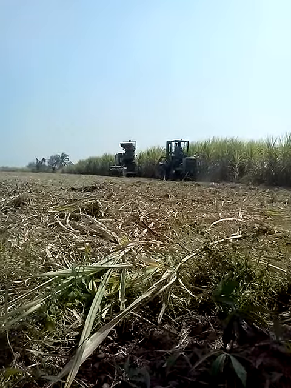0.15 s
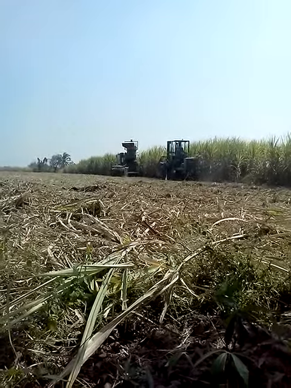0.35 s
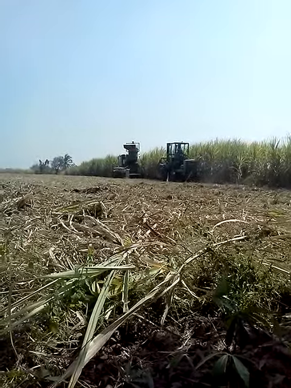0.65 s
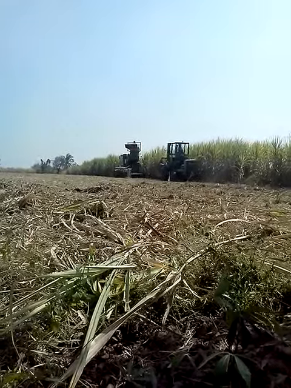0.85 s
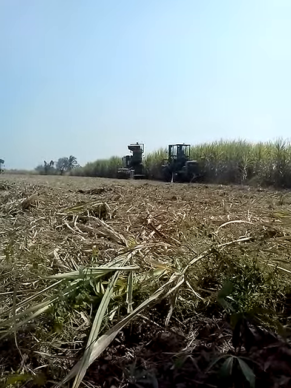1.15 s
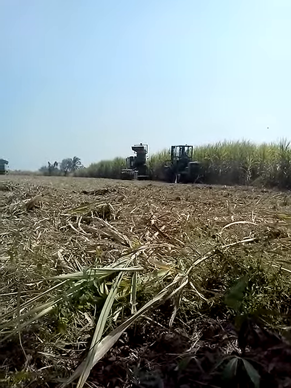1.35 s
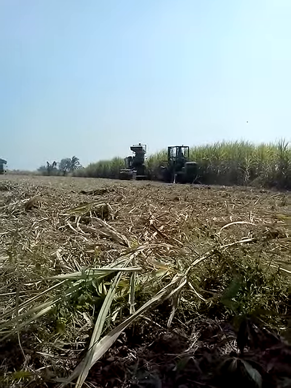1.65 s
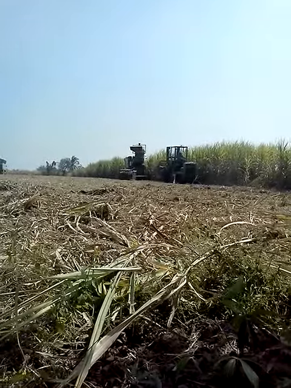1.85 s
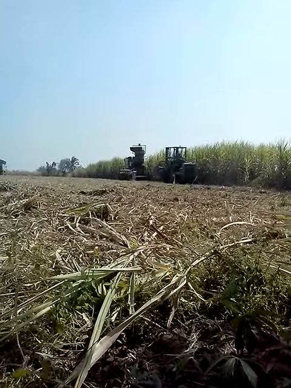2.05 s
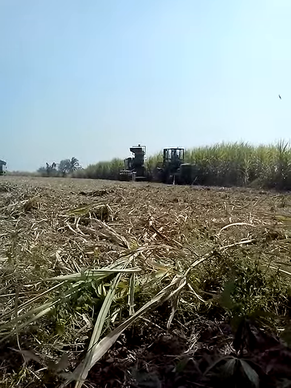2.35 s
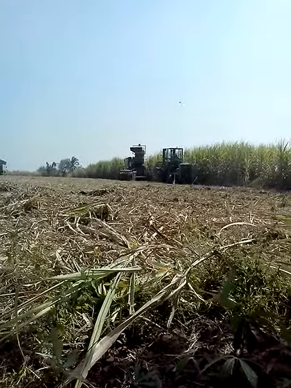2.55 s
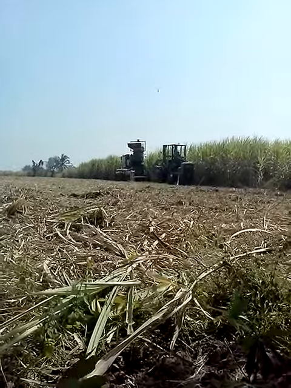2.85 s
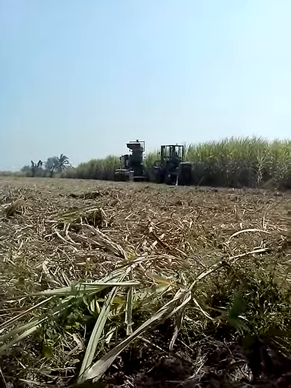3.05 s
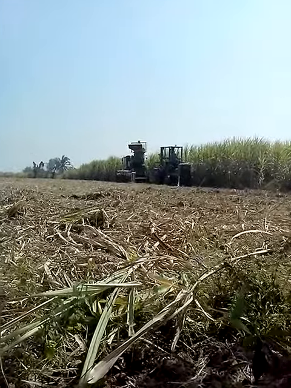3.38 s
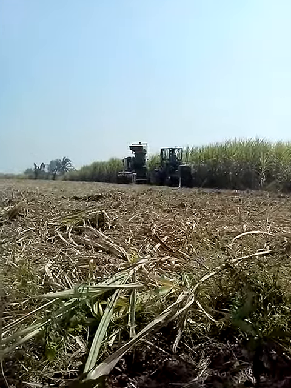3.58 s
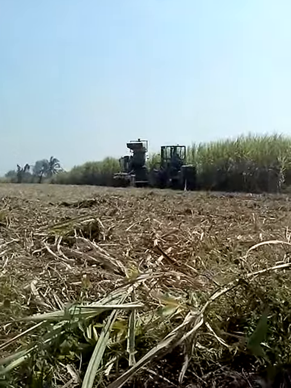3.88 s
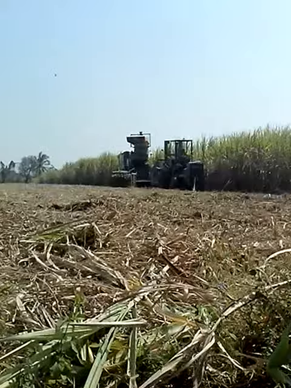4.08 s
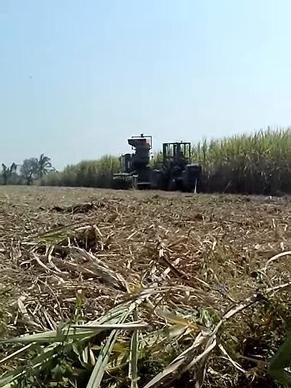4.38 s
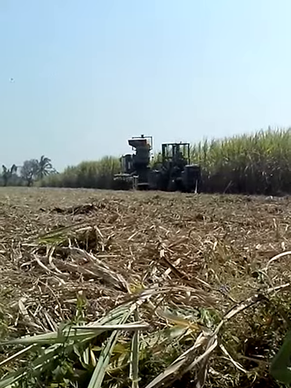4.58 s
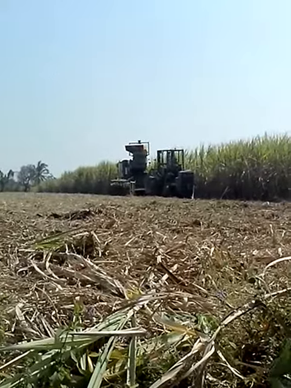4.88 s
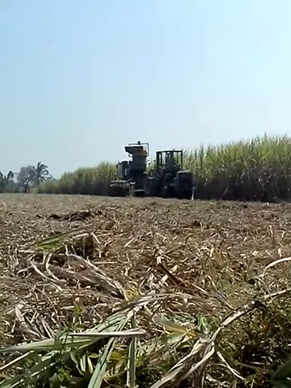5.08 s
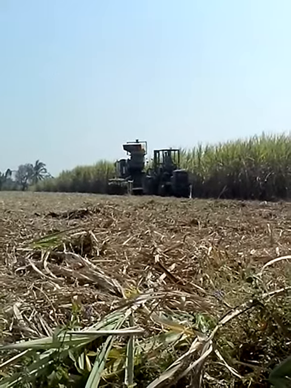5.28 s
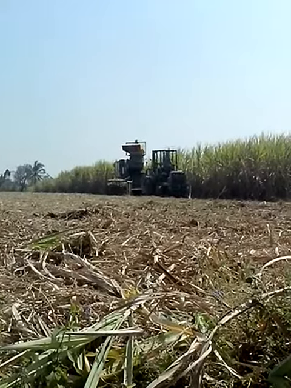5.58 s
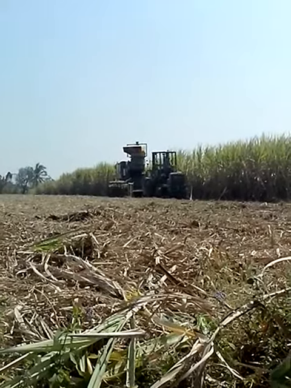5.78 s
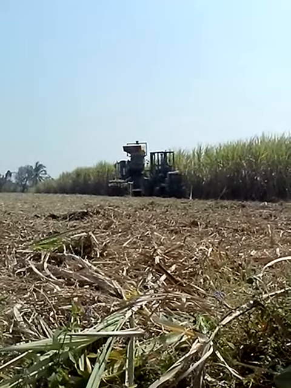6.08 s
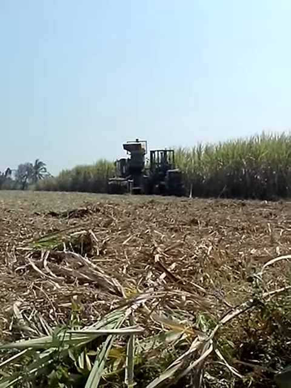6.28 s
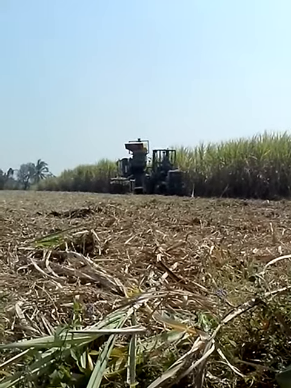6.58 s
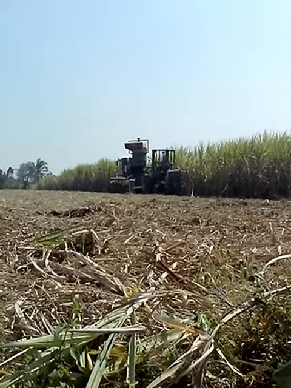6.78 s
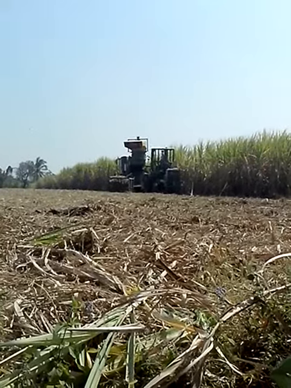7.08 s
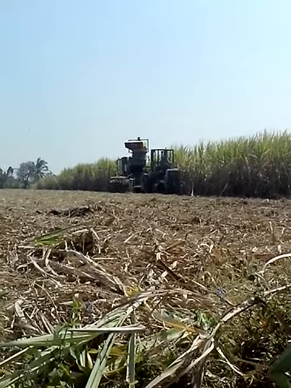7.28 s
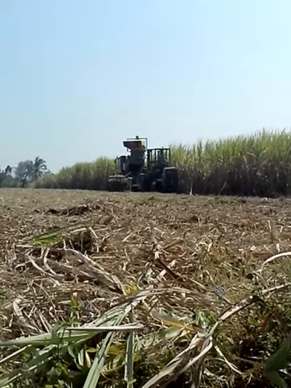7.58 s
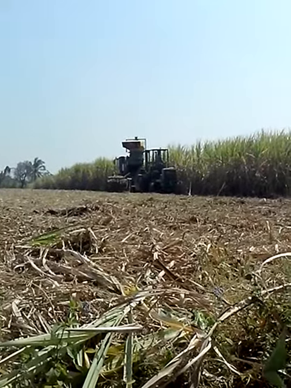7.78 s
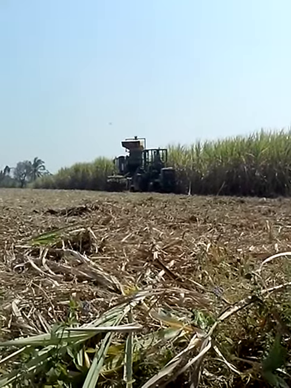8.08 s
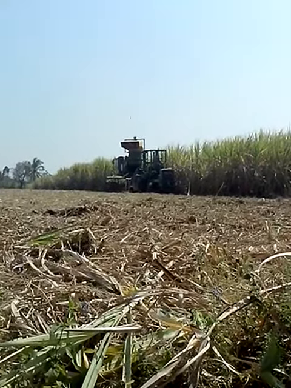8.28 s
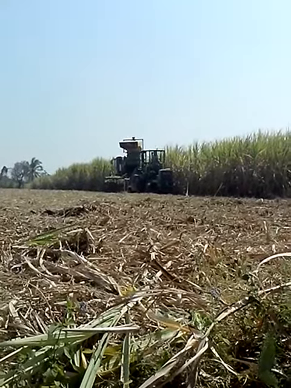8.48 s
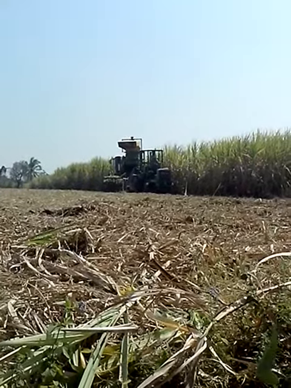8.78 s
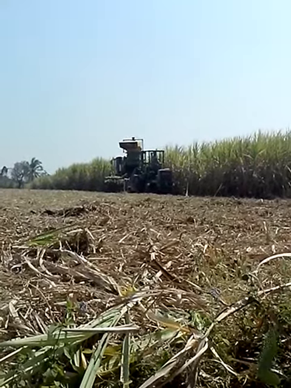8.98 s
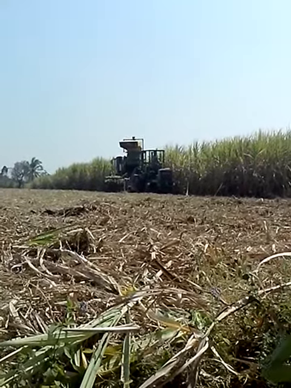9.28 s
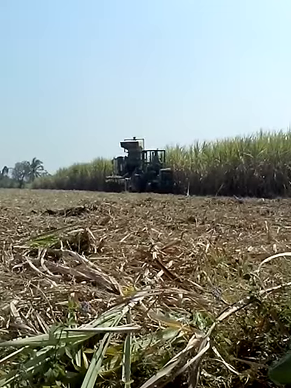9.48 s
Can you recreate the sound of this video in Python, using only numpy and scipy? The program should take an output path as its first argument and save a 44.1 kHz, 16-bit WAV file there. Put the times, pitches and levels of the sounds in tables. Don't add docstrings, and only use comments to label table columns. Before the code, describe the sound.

Distant farm engines: rough metallic diesel clatter above a broad chopping-machine roar, easing to a lower, slower idle, with low wind thumps and one dry leaf tick.

```python
import sys
import numpy as np
from scipy import signal
from scipy.fft import rfft, irfft, next_fast_len
from scipy.io import wavfile
from scipy.ndimage import uniform_filter1d, map_coordinates

SR = 44100
rng = np.random.default_rng(int(sys.argv[2]) if len(sys.argv) > 2 else 0)


def gain_from_db(level_db):
    decades = np.asarray(level_db, float) / 20
    return 10 ** decades


def wav_record(signal):
    frames = np.transpose(np.atleast_2d(signal))
    bounded = np.clip(frames, -1, 1)
    quanta = np.round(bounded * 32767).astype(np.int16)
    wavfile.write(sys.argv[1], SR, quanta)


N = 425565


def unit(x):
    return x / np.sqrt(np.mean(x ** 2) + 1e-20)


def along(points, hz):
    f, v = np.transpose(points)
    return np.interp(np.log(hz + 1), np.log(f + 1), v)


def curves(rows):
    s, *cols = np.transpose(rows)
    return [np.interp(np.arange(N) / SR, s, c) for c in cols]


def spells(rows):
    t = np.arange(N) / SR
    return sum(db * np.exp(-((t - s) / half) ** 2) for s, half, db in rows)


def wobble(rate):
    return map_coordinates(rng.standard_normal(int(N * rate / SR) + 4), [np.arange(N) * rate / SR])


def filtered(x, response):
    m = next_fast_len(N + SR // 2)
    return irfft(rfft(x, m) * response(np.fft.rfftfreq(m, 1 / SR)), m)[..., :N]


def resonances(modes):
    def response(f):
        return sum(gain_from_db(db) * (1j * f * w / (c * c - f * f + 1j * f * w)) ** 2 for c, w, db in modes)
    return response


def rush(spectrum, patchy_db):
    z = signal.stft(rng.standard_normal(N), nperseg=512)[2]
    field = uniform_filter1d(rng.standard_normal(z.shape), size=6, axis=0)
    field = uniform_filter1d(field, size=14, axis=1)
    noise = signal.istft(z * gain_from_db(patchy_db * unit(field)), nperseg=512)[1][:N]
    return unit(filtered(noise, lambda hz: gain_from_db(along(spectrum, hz))))


# [t/s, level/dB]
BREEZE = [(0, -32), (.4, -35.5), (.73, -35.5), (2.04, -34), (3.5, -38), (4.84, -36.5), (5.59, -40),
          (6.3, -35.5), (6.8, -36), (7.3, -34.5), (7.9, -33), (8.4, -36), (9.65, -34)]
# [f/Hz, level/dB]
RUMBLE = [(18, -81.5), (30, -49.5), (69, -10), (78, -12), (92, -10), (138, -0.5), (155, -1.5), (182, -5.5),
          (220, -9.5), (253, -12.5), (346, -18), (387, -23.5), (473, -27), (600, -27.5), (780, -58),
          (1320, -120)]
# [centre t/s, half length/s, level/dB]
GUSTS = [(1.35, 0.043, 5.5), (1.51, 0.077, 8.5), (1.89, 0.071, 10.5), (3.03, 0.044, 9), (5.9, 0.02, 5.5),
         (6.62, .04, 4.5), (8.17, .05, 5), (8.6, 0.018, 6.5)]
# [centre t/s, peak level/dB, f/Hz]
EDDIES = [(0.18, -24, 159), (0.2244, -18.5, 163), (0.3509, -24.5, 168), (1.3548, -19, 163),
          (1.464, -26, 390), (1.478, -14, 282), (1.4841, -13, 152.5), (1.5144, -14.5, 159),
          (1.5506, -15.5, 178), (1.5598, -15, 153), (1.6632, -23, 533), (1.666, -28, 330),
          (1.4939, -17.5, 110), (1.908, -16, 113), (1.7272, -16.5, 171), (1.8338, -14, 189),
          (1.836, -19, 264), (1.8613, -14.5, 149), (1.9003, -17, 218), (1.9117, -22, 141),
          (1.9544, -12.5, 136), (2.3217, -21, 169), (2.3459, -23, 159), (2.4643, -20.5, 181),
          (3.015, -15.5, 132.6), (3.0536, -16.5, 158), (3.079, -19.5, 143), (7.423, -22.5, 140),
          (7.6566, -22.5, 180), (8.141, -16.5, 140)]
EDDY_CYCLES = 0.91


def wind():
    lumpy = gain_from_db(1.2 * wobble(25)) * rush(RUMBLE, patchy_db=0)
    rumble = gain_from_db(curves(BREEZE)[0] + spells(GUSTS)) * unit(lumpy)
    eddies, t = np.zeros(N + SR), np.arange(-SR // 25, SR // 25) / SR
    for s, db, hz in EDDIES:
        phase = rng.uniform(0, 2 * np.pi)
        swing = np.cos(2 * np.pi * hz * t * (1 - 12 * t) + phase)
        eddies[round(s * SR):][:len(t)] += gain_from_db(db) * np.exp(-(t * hz / EDDY_CYCLES) ** 2) * swing
    return rumble + eddies[SR // 25:][:N]


# [t/s, peak level/dB, f/Hz, length/s]
LEAF = [
    (9.418, -42, 6880, .008),
    (9.431, -41, 7160, 0.0071),
    (9.432, -34, 5000, 0.0088),
    (9.433, -26.5, 6140, 0.0082),
    (9.444, -25, 7040, 0.0034),
    (9.4435, -38, 590, 0.0045),
]


def leaf():
    ticks = np.zeros(N + SR)
    for s, db, hz, length in LEAF:
        t = np.arange(round(length * SR)) / SR
        ring = np.sin(2 * np.pi * hz * t) + 0.55 * rng.standard_normal(SR // 30)[:len(t)]
        ticks[round(s * SR):][:len(t)] += gain_from_db(db) * np.sin(np.pi * (t / length) ** 1.3) * ring
    return ticks[:N]


# [f/Hz, level/dB]
DRONE = [(51.5, -58), (103, -43), (154, -46)]
DRONE_FROM_S = 6.85


def drone():
    t = np.arange(N) / SR
    lines = 0
    for hz, db in DRONE:
        lines = lines + gain_from_db(db + 1.6 * wobble(3.9)) * np.sin(2 * np.pi * hz * t + .5 * wobble(2.4))
    return np.clip((t - DRONE_FROM_S) / 0.1, 0, 1) * lines


# [t/s, level/dB]
LOAD = [(0, -33), (.6, -36), (.76, -34.5), (1.02, -35), (1.84, -34.5), (2.76, -37), (3.04, -36.5),
        (3.63, -37), (4.15, -36.5), (5, -39), (6.39, -41.5), (7.25, -39), (8.05, -41), (9.05, -43.5),
        (9.65, -41)]
# [f/Hz, level/dB per Hz]
ROAR = [(180, -37), (300, -5), (389, -11), (463, -6), (525, -13.5), (809, -2.5), (953, -10), (1220, 2),
        (1350, -1), (1560, -9.5), (1980, 0), (2160, -5.5), (2340, -5), (2520, -11.5), (3000, -13),
        (3900, -34), (6600, -120)]
# [f/Hz, level/dB per Hz]
HISS = [(1530, -42), (2600, -20.5), (3160, -8), (3960, -1), (4640, -5), (5060, -2.5), (5760, -13),
        (6270, -9.5), (6930, -15.5), (7540, -22.5), (8050, -19), (8590, -40), (11200, -69.5), (18900, -120)]
# [f/Hz, level/dB]
GEARS = [(825, -64), (1199, -59)]
HISS_DB, HISS_FOLLOWS = -44, 0.24


def harvester(count, effort_db):
    pulse = 1 + 0.071 * np.cos(2 * np.pi * count)
    roar = pulse * gain_from_db(0.31 * wobble(12)) * rush(ROAR, patchy_db=0.5)
    t = np.arange(N) / SR
    gears = 0
    for hz, db in GEARS:
        level = gain_from_db(db + 42.5 + 2.2 * wobble(2.2))
        gears = gears + level * np.sin(2 * np.pi * hz * t + 1.57 * wobble(4))
    hiss_db = HISS_DB + HISS_FOLLOWS * (effort_db - effort_db.mean())
    hiss = gain_from_db(hiss_db + 1.0 * wobble(20)) * rush(HISS, patchy_db=1.5)
    return gain_from_db(curves(LOAD)[0]) * (roar + gears) + hiss


# [t/s, firing rate f/Hz]
SPEED = [(0.0, 44.74), (0.598, 49.14), (0.727, 46.43), (2.471, 45.42), (2.63, 43.11), (2.808, 46.33),
         (4.225, 44.01), (4.375, 41.31), (4.542, 44.5), (4.89, 39.19), (5.585, 32.36), (5.711, 36.85),
         (6.127, 30.13), (6.633, 34.06), (6.915, 30.03), (7.813, 29.12), (7.988, 33.11), (9.65, 30.95)]
# [t/s, level/dB]
SLIP = (4.137, -38)
FIRST_FIRING, SLIP_SKIPS = -.11, 1.22
FULL_SPEED = 45.5


def crank():
    speed = uniform_filter1d(curves(SPEED)[0], size=SR // 5, mode="nearest")
    skipped = SLIP_SKIPS * (np.arange(N) > SLIP[0] * SR)
    return FIRST_FIRING + np.cumsum(speed) / SR + skipped, np.log2(speed / FULL_SPEED)


# [multiple of the firing rate, level/dB]
ORDER = [(1, -22), (2, -4), (2.5, -6), (3, 0), (3.75, -7), (4, -5), (6, -14), (9, -20), (10.5, -20)]
HUM_DB, HUM_DB_PER_OCTAVE = -36.5, 21.5
FAN_BLADES, FAN_DB, FAN_IDLES_S, FAN_IDLE_DB = 4.73, -35.5, 5.51, -49


def hum(count, octaves):
    lines = 0
    for k, db in ORDER:
        lines = lines + gain_from_db(db + 3.6 * wobble(3.03)) * np.sin(2 * np.pi * k * count + 0.61 * wobble(6))
    exhaust = gain_from_db(HUM_DB + HUM_DB_PER_OCTAVE * octaves) * lines
    fan_db = np.interp(np.arange(N) / SR, [FAN_IDLES_S - .2, FAN_IDLES_S + 0.25], [FAN_DB, FAN_IDLE_DB])
    fan = gain_from_db(fan_db + 1.2 * wobble(6.9)) * np.sin(2 * np.pi * FAN_BLADES * count + 0.59 * wobble(4.6))
    return filtered(exhaust, lambda f: 1 / (1 + (76 / (f + 1)) ** 4)) + fan


# [t/s, peak level/dB, low mode against the rest/dB]
HARD = [(8.104, -31.5, 1), (0.827, -19, -9), (0.958, -17, -11), (1.174, -15, -20), (1.434, -18.5, -5),
        (1.5208, -14, -13), (6.2257, -24.5, -20), (1.6513, -15, -24), (1.696, -17, -8), (1.9135, -16, -5),
        (1.958, -12.5, -17), (2.1095, -13.5, -32), (2.218, -19.5, 0), (6.659, -24, -1), (7.8226, -30, -4),
        (2.4843, -11.5, -16), (2.9284, -16, -17), (4.143, -23, -10), (4.421, -25.5, 5), (5.5637, -19.5, -4),
        (6.0336, -13.5, -10), (6.13, -17.5, -22), (6.1622, -15, -11), (6.292, -19.5, 1), (8.164, -30, -7),
        (6.417, -24, 0), (7.037, -28, 11.5), (7.244, -19.5, -7.5), (7.445, -20, -6), (7.854, -24.5, -2)]
# [f/Hz, width/Hz, level/dB]
BLOCK = [(4023, 200, -0.5), (4212, 247, -1), (4490, 120, -15.5), (4740, 590, -10.5), (4984, 190, -14.5)]
# [f/Hz, width/Hz, level/dB]
LOW_MODE = [(3599, 172, 0.003)]
# [f/Hz, width/Hz, level/dB]
COVERS = [(2023, 320, -6), (2330, 170, -7), (2887, 250, -12), (5000, 200, -13), (5350, 160, -9),
          (6066, 160, -12), (6904, 130, -11.5), (7290, 400, -21)]
# [f/Hz, width/Hz, level/dB]
LOOSE = [(6576, 170, -13)]
# [centre t/s, half length/s, level over its rest/dB]
BUZZ = [
    (.85, 0.79, 8.5),
    (4.1, 0.68, 7.5),
    (5.9, 0.24, 12),
]
# [centre t/s, half length/s, level/dB]
SHAKE = [
    (2.1, 0.91, 5.5),
]
CYLINDER_DB = [-1, 3.5, -2, 4]
UNEVEN_PER_OCTAVE = 1.2
SCATTER_DB, LOW_SCATTER_DB = 1.1, 2.5
TURN_S, LOW_DB, LOW_TURNED_DB = 3.4, -7.5, 0
LOOSE_REST_DB = -2


def knock(count, octaves, effort_db):
    firing = np.floor(count + .26).astype(int)
    at = np.flatnonzero(np.diff(firing) > 0) + 1
    chance = rng.standard_normal((len(at), 3))
    habit_db = np.array(CYLINDER_DB)[firing[at] % len(CYLINDER_DB)]
    habit_db = habit_db * (1 - UNEVEN_PER_OCTAVE * octaves[at])
    size_db = effort_db[at] + habit_db + SCATTER_DB * chance[:, 0]
    low_db = np.where(at > TURN_S * SR, LOW_TURNED_DB, LOW_DB) + LOW_SCATTER_DB * chance[:, 1]
    for s, db, rel_db in HARD:
        nearest = np.argmin(abs(at - s * SR))
        at[nearest] = round((s - .002) * SR)
        size_db[nearest], low_db[nearest] = db - 8, rel_db + 2.5
    t = np.arange(SR // 12) / SR
    decay = gain_from_db(-60 * t / 0.028) + 0.13 * gain_from_db(-60 * t / .12)
    shape = (1 - np.exp(-t / 0.00092)) ** 2 * decay

    def burst(db):
        return signal.fftconvolve(np.bincount(at, gain_from_db(db), N), shape)[:N] * rng.standard_normal(N)

    block = filtered(burst(size_db), resonances(BLOCK))
    block = block + filtered(burst(size_db + low_db), resonances(LOW_MODE))
    shake_db = 0.89 * (np.minimum(size_db, -31) + 39.5) - 42.5 + 4.2 * np.tanh(chance[:, 2])
    rattle_db = LOOSE_REST_DB + spells(BUZZ)[at]
    big = filtered(burst(shake_db + spells(SHAKE)[at]), resonances(COVERS[:3]))
    small = filtered(burst(shake_db), resonances(COVERS[3:]))
    loose = filtered(burst(shake_db + rattle_db), resonances(LOOSE))
    return gain_from_db(25.5) * (block + big + small + loose)


# [t/s, usual knock level/dB]
EFFORT = [(0, -31), (.42, -31.5), (.62, -37), (1.1, -32.5), (1.95, -30.5), (2.3, -32), (2.92, -31.5),
          (3.06, -41.5), (3.5, -37), (4, -41), (4.45, -37.5), (4.85, -45.5), (5.6, -37.5), (5.88, -44.5),
          (6.3, -39.5), (6.95, -47), (7.4, -42.5), (8.4, -52)]


def scene():
    count, octaves = crank()
    effort_db = curves(EFFORT)[0]
    background = wind() + leaf() + drone() + harvester(count, effort_db)
    tractor = hum(count, octaves) + knock(count, octaves, effort_db)
    return (background + tractor)[None]


def roll_off(x):
    return signal.sosfilt(signal.butter(12, 9220, fs=SR, output="sos"), x)


# [f/Hz, level/dB]
MIC = [(20, -35), (45, -11), (70, -7), (100, -0.5), (7300, -1.5), (7800, -10), (8000, -18), (8100, -53.5)]
# [f/Hz, level/dB]
MIRROR = [(7900, -80), (8050, -27), (8400, -15.5), (8800, -29), (9250, -54.5), (9500, -90)]


def record(dry):
    mirrored = 2 * dry * np.cos(2 * np.pi * 16000 * np.arange(N) / SR)
    heard = filtered(dry, lambda hz: gain_from_db(along(MIC, hz)))
    heard = heard + filtered(mirrored, lambda hz: gain_from_db(along(MIRROR, hz)))
    slip_s, slip_db = SLIP
    heard[:, round(slip_s * SR):][:, :90] += gain_from_db(slip_db) * np.linspace(1, 0, num=90)
    return roll_off(heard)


dry = scene()
out = record(dry)
wav_record(out)
```